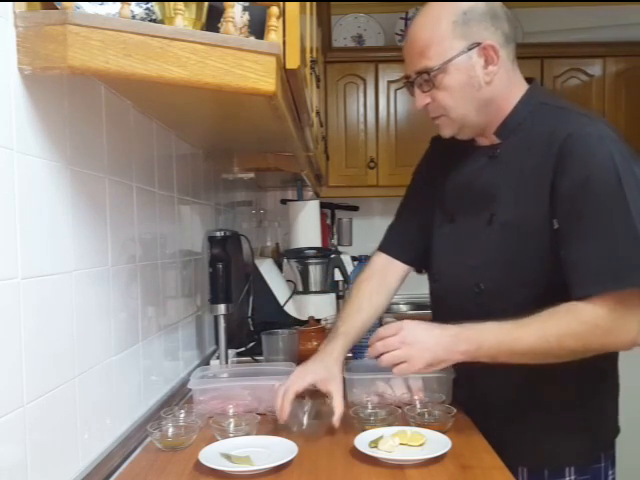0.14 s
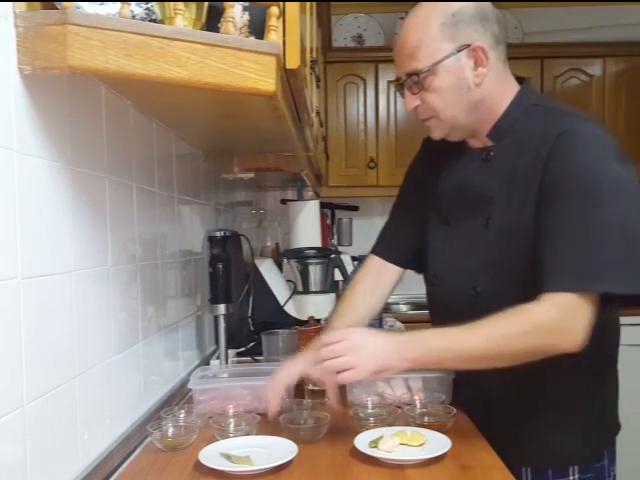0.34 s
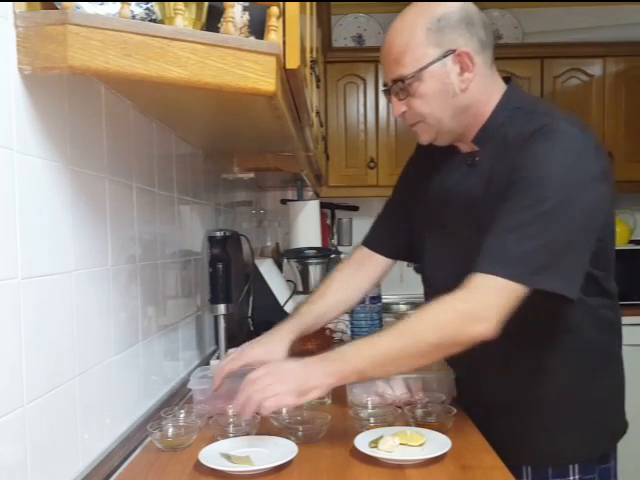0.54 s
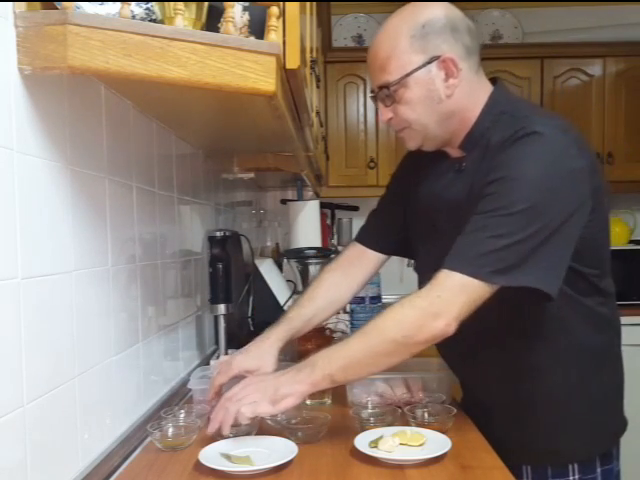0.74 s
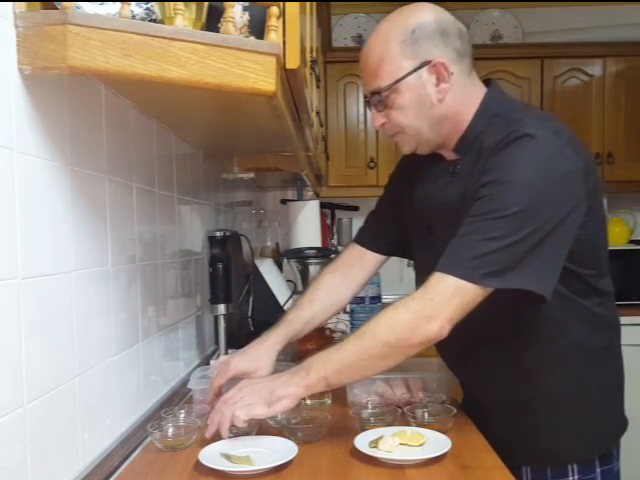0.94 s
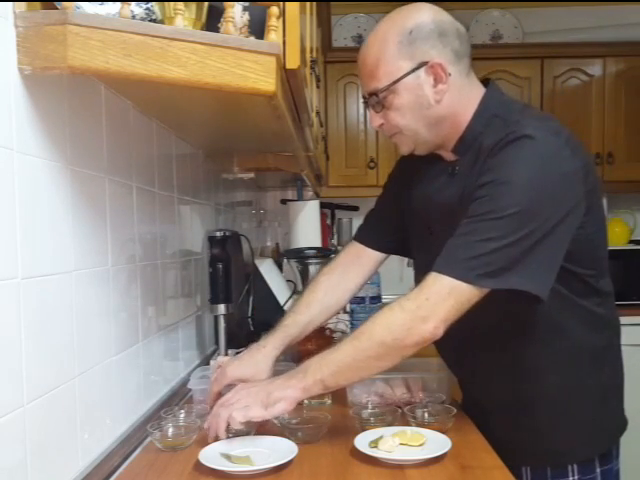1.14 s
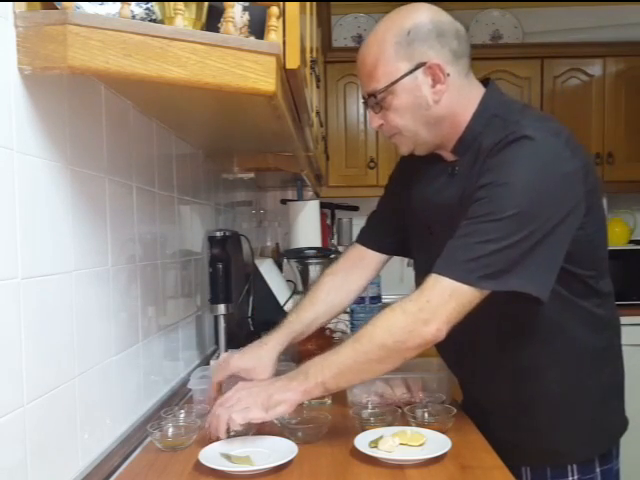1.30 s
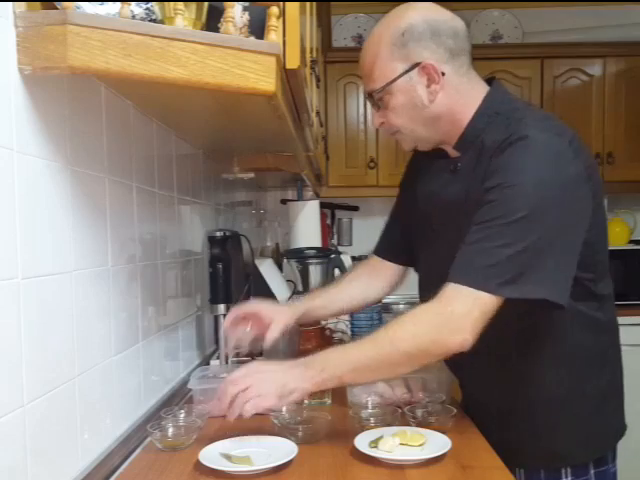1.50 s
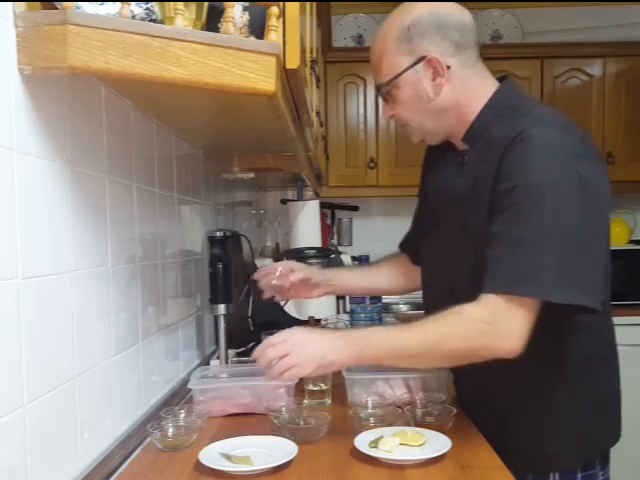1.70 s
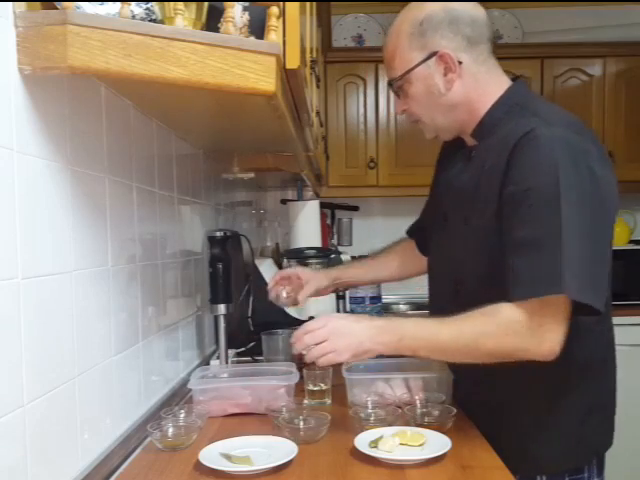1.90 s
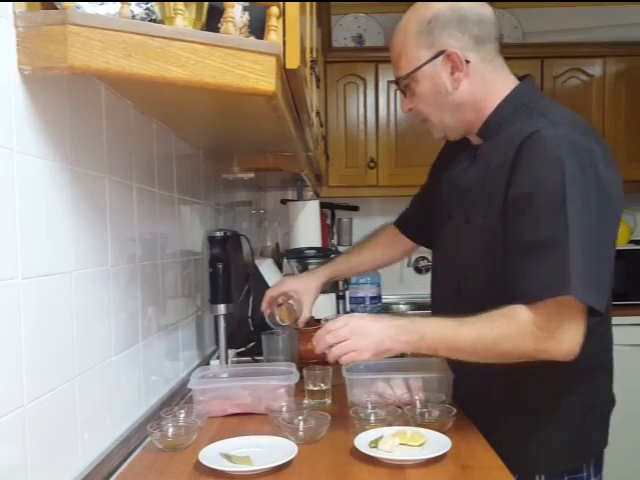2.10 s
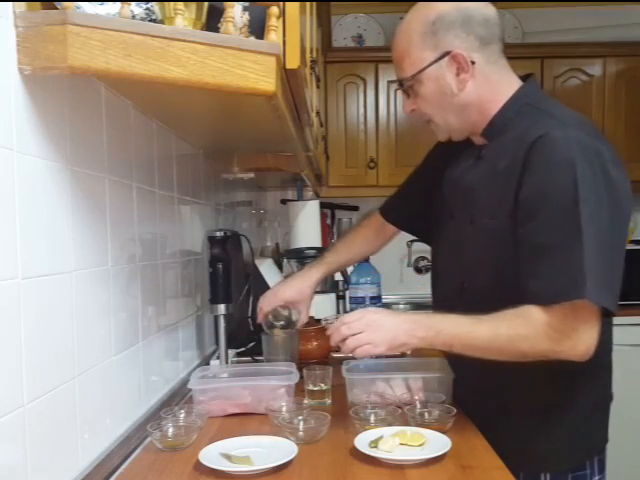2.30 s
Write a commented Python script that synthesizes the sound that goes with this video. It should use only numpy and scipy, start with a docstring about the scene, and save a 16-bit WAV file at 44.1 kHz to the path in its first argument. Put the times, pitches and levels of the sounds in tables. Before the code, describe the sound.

Glass bowls are set down and shuffled on a counter, clinking over a faint hum.

```python
"""A quiet appliance hum and room noise, then knocks: small glass bowls set down on a wooden counter.
Each contact is a short pulse that rings the counter and a tub; the tiled kitchen draws it out.
Nested bowls clink in their glass modes and rattle as they are dragged.
At the end a hollow vessel is tapped twice and its air column rings."""
import sys
import numpy as np
from scipy import signal
from scipy.fft import rfft, irfft
from scipy.io import wavfile

SR = 44100
rng = np.random.default_rng(int(sys.argv[2]) if len(sys.argv) > 2 else 0)


def wrap_up_sound(samples):
    """Save the sound to the file named by the first command line argument, as 16-bit audio."""
    columns = np.atleast_2d(samples).T
    # keep every value between -1 and 1, then stretch to whole-number steps
    tamed = np.clip(columns, -1, 1)
    steps = np.round(tamed * 32767).astype(np.int16)
    wavfile.write(sys.argv[1], SR, steps)


N = 103635

# room noise spectrum: f/Hz, level/dB
NOISE_SPECTRUM = [(30, -24.5), (60, -22.5), (100, -18.5), (180, -15), (260, -8), (420, -13), (700, -14),
                  (1200, -22), (2500, -28.5), (5000, -35), (8000, -42.5), (10000, -44), (14500, -48.5),
                  (16500, -62.5)]
# room noise drift: t/s, level/dB
NOISE_DRIFT = [(0, 1), (.7, 3.5), (1.6, -1), (1.85, 1.5), (2.0, -2), (2.35, -0.5)]
# room noise: f/Hz, left-right correlation
NOISE_CORRELATION = [(60, 0.49), (240, 0.45), (950, 0.18), (3770, 0.01), (15000, 0.0741)]
# appliance tones: f/Hz, rms level/dB
HUM_TONES = [(30, -83), (60.2, -69.5), (119.6, -79.5), (179.8, -72.5), (301, -63), (360.3, -77.5),
             (428, -70.5)]
# contacts: t/s, level/dB, 6 x colour/dB at COLOUR_HZ, counter ring/dB, own ring f/Hz, own ring/dB
CONTACTS = [(.2345, -12, 2.5, 1, 2.8, 3.5, 3, 0, -2.5, 1515, -10.5),
            (0.6218, -33.5, 23, 2, 0, -16.5, -1, -7, -3, 1327, -1),
            (.829, -41.5, 12, 23, 0.66, -7, -10, -12, -3, 874, -14),
            (0.8439, -28.5, 19.5, -9, 0, 12, 19, 9, -3, 2490, -18),
            (.859, -27.5, -17, -9, 0, -30, 4, -8, -7.5, 1358, 14.5),
            (0.8796, -40.5, -2.5, -32, 0.15, 11.5, -15, -8, 13, 3000, 11),
            (0.9303, -30, 5, 9, 0, -7, -11, 5.5, -5, 2056, 15),
            (0.988, -20.5, -11, 7.5, -4.5, -3, -8, -4, 0, 1775, -1.5),
            (1.0379, -16.5, 3, -2.5, 0.095, 2, 2, -13, -2.5, 1500, -3.5),
            (1.067, -27, -23.5, 14, 0.038, 6.5, -9, 1, -5.5, 1590, -1.5),
            (1.093, -32, 14, -6.5, 0.65, -4, -26, 1, 3.5, 1260, 11),
            (1.135, -37.5, 9.5, 15, 0.22, -19, -8, 2, -2.5, 1400, 3),
            (1.2195, -32, -1, 20.5, 1.6, 16, 26, 15.5, -9, 2234, 3.5),
            (1.81, -66.5, 4.5, 6.5, 0.35, 7, 5.5, -5, 0, 2070, 0),
            (2.2353, -51, 17, 8.5, 1, 5.5, 31, 15.5, 2, 3980, -3),
            (2.298, -47.5, 26, 12.5, 0.075, -10, 23.5, 5, -9, 1186, -7.5)]
# colour points: f/Hz
COLOUR_HZ = [170, 550, 1300, 2600, 5000, 14000]
# knock spectrum as heard through the microphone, with its 9.5 kHz dip and 14 kHz peak: f/Hz, level/dB
KNOCK_AT_MIC = [(30, -50.5), (80, -36.5), (170, -17), (300, -12), (600, -17.5), (1100, 2), (1800, 0),
                (2500, -6.5), (3300, -19.5), (4200, -20.5), (5500, -33.5), (7000, -34), (9500, -52),
                (11500, -38), (14200, -23.5), (15200, -34), (15800, -58.5)]
# modes of counter and tub: f/Hz, level/dB, t60/s
COUNTER_MODES = [(166.1, -19, 0.067), (466.7, -24.5, 0.3), (620.4, -18.5, 0.17), (760, -11, 0.19),
                 (1000, -10.5, 0.15), (1087, -10.5, 0.13), (1218, -16, 0.24), (1295, -10.5, 0.092),
                 (1521, -12.5, 0.17), (1636, -9.5, 0.041)]
# near walls: delay t/s, level/dB
WALL_ECHOES = [(.0022, -9.5), (0.0131, -2.5), (.033, -10)]
# reverb decay: f/Hz, t60/s
TAIL_T60 = [(80, 0.57), (200, 0.49), (500, 0.54), (1200, 0.47), (2500, 0.43), (5000, 0.35), (9000, 0.38),
            (14000, 0.44)]
# reverb: f/Hz, left-right correlation
TAIL_CORRELATION = [(100, 1), (300, 0.76), (600, 0.82), (1200, 0.43), (4000, -0.2), (14000, -0.072)]
# balance of reverb and room noise: f/Hz, left minus right/dB
BALANCE = [(60, 1), (180, 4.0), (550, 2), (1650, 1.5), (4970, 5), (15000, -2)]
# glass on glass: t/s, 6 x level/dB at CLINK_POINTS_HZ
CLINK_HITS = [(.6225, -76, -72, -78, -89.5, -88, -95), (0.8415, -40.5, -32, -49.5, -54, -40, -59.5),
              (0.8804, -28.5, -50.5, -24, -42, -39.5, -60.5), (0.9043, -29.5, -32.5, -71, -60, -49.5, -60),
              (0.9306, -26, -57, -65.5, -74, -57.5, -47.5), (.989, -24.5, -53.5, -63, -70, -56, -42),
              (1.0397, -34.5, -69, -57.5, -83, -59, -43.5), (1.091, -25.5, -71.5, -63.5, -81, -65.5, -44.5),
              (1.221, -35, -48, -37, -53, -65, -74)]
# clink level points: f/Hz
CLINK_POINTS_HZ = [1900, 4000, 7100, 8900, 12000, 14100]
# bowl modes: f/Hz
BOWL_HZ = [1881, 1926, 2466, 3997, 4037, 4110, 6998, 7176, 8818, 9001, 11900, 11970, 14120]
# per bowl mode: level/dB, t60/s
BOWL_MODES = [(-1, .3), (0.5, 0.09), (-21, 0.068), (2.5, 0.1), (1.5, 0.27), (-3, 0.3), (-13, .3),
              (-7, 0.13), (5, 0.13), (1.5, 0.16), (-14, 0.15), (-0.5, 0.18), (6, .2)]
# drag envelope: t/s, level/dB
DRAG_LEVEL = [(.83, -56.5), (0.861, -37), (0.999, -41), (1.098, -43), (1.16, -58.5), (1.2, -67)]
# vessel taps: t/s, level/dB, f/Hz, swell/s, t60 factor
VESSEL_TAPS = [(2.236, -39, 600, 0.00057, 1), (2.295, -19, 558, 0.011, 0.47)]
# air column modes: frequency ratio, level/dB, t60/s
VESSEL_MODES = [(1.0, -2.5, 0.17), (1.2, 6, 0.027), (2.97, -12, 0.11), (5.0, -10, 0.052)]

BAND_EDGES_HZ = 28 * 2 ** np.arange(0, 9.4, 1 / 3)
BAND_CENTRES_HZ = np.sqrt(BAND_EDGES_HZ[:-1] * BAND_EDGES_HZ[1:])
TIME_S = np.arange(N) / SR
SIDES = np.array([[1], [-1]])   # left, right


def from_db(db):
    return 10 ** (np.asarray(db) / 20)


def at_hz(points, hz):
    points_hz, values = np.transpose(points)
    return np.interp(np.log(hz), np.log(points_hz), values)


def band(x, k):
    return signal.sosfilt(signal.butter(4, BAND_EDGES_HZ[k:k + 2], "band", fs=SR, output="sos"), x)


def stereo(noise, correlation, hz):
    """Two noises as mid and side, panned by BALANCE."""
    correlation = np.clip(correlation, -.99, .99)
    mid = np.sqrt((1 + correlation) / 2) * noise[0]
    side = np.sqrt((1 - correlation) / 2) * noise[1]
    return from_db(at_hz(BALANCE, hz) / 2 * SIDES) * (mid + side * SIDES)


def ring(times_s, levels_db, hz, t60_s):
    """Clicks, softened over one cycle, drive a damped mode."""
    clicks = np.zeros(N)
    clicks[(np.asarray(times_s) * SR).astype(int)] = from_db(levels_db)
    window = np.hanning(int(SR / hz) + 3)
    force = signal.lfilter(2 * window / window.sum(), [1], clicks)
    radius, angle = from_db(-60 / (t60_s * SR)), 2 * np.pi * hz / SR
    return signal.lfilter([0, np.sin(angle)], [1, -2 * radius * np.cos(angle), radius ** 2], force + 1e-18)


def appliance_hum(waver_db=2.5):
    """Low tones, each wavering in level, slightly left."""
    out = 0
    for hz, db in HUM_TONES:
        waver = np.interp(TIME_S, np.linspace(0, N / SR, 30), rng.standard_normal(30))
        tone = np.sqrt(2) * np.sin(2 * np.pi * (hz * TIME_S + rng.random()))
        out += from_db(db + waver_db * waver) * tone
    return out * from_db(1.5 * SIDES)


def room_noise(base_db=-59):
    """Third-octave noise bands; the overall level drifts."""
    noise, out = rng.standard_normal((2, 2, N)), 0
    for k, hz in enumerate(BAND_CENTRES_HZ):
        pair = stereo(band(noise[k % 2], k), at_hz(NOISE_CORRELATION, hz), hz)
        out += from_db(at_hz(NOISE_SPECTRUM, hz)) * pair
    drift_db = np.interp(TIME_S, *np.transpose(NOISE_DRIFT))
    return from_db(base_db + drift_db) * out / np.sqrt(np.mean(out ** 2))


def knock_pulse(colour_db, gain_db=21):
    """Minimum-phase pulse: knock spectrum as heard through the microphone, plus colour."""
    hz = np.maximum(np.fft.rfftfreq(4096, 1 / SR), 1)
    db = gain_db + at_hz(KNOCK_AT_MIC, hz) + np.interp(np.log(hz), np.log(COLOUR_HZ), colour_db)
    cepstrum = irfft(db * np.log(10) / 20)
    causal_fold = np.r_[1, np.full(2047, 2), 1, np.zeros(2047)]
    return irfft(np.exp(rfft(cepstrum * causal_fold)))


def knocks():
    """One pulse per contact with counter or tub."""
    out = np.zeros(N + SR)
    for start_s, db, *colour_db in np.array(CONTACTS)[:, :8]:
        pulse = from_db(db) * knock_pulse(colour_db)
        out[int(start_s * SR):][:len(pulse)] += pulse
    return out[:N]


def counter_ring(scatter_db=0.83):
    """Each knock excites the modes of counter and tub."""
    rows, out = np.array(CONTACTS), 0
    times_s, knock_db, colours_db, ring_db = rows[:, 0], rows[:, 1], rows[:, 2:8], rows[:, 8]
    random_db = rng.normal(0, scatter_db, (len(rows), len(COUNTER_MODES)))
    for k, (hz, mode_db, t60_s) in enumerate(COUNTER_MODES):
        colour_db = [np.interp(np.log(hz), np.log(COLOUR_HZ), colour) for colour in colours_db]
        out += ring(times_s, mode_db + knock_db + colour_db + ring_db + random_db[:, k], hz, t60_s)
    return out


def contact_rings(t60_s=0.051):
    """Each knock also rings at its own pitch."""
    return sum(ring([start_s], db + ring_db, hz, t60_s) for start_s, db, *_, hz, ring_db in CONTACTS)


def kitchen(pulses, rings, pulse_tail_db=-17, ring_tail_db=-31.5):
    """Direct sound, wall echoes and a noise tail decaying per band."""
    onset_s, left_delay_s, near_balance_db = 0.0018, 0.00016, 4.5
    t, noise, tail = np.arange(SR // 2) / SR, rng.standard_normal((2, SR)), 0
    for k, hz in enumerate(BAND_CENTRES_HZ):
        envelope = from_db(-60 * t / at_hz(TAIL_T60, hz)) * (1 - np.exp(-t / onset_s))
        tail += envelope * stereo(band(noise, k)[:, -len(t):], at_hz(TAIL_CORRELATION, hz), hz)
    near = np.zeros_like(tail)
    near[0, int(left_delay_s * SR)] = near[1, 0] = 1
    for delay_s, db in WALL_ECHOES:
        delay_samples = (delay_s * SR * rng.uniform(.97, 1.03, 2)).astype(int)
        near[[0, 1], delay_samples] = from_db(db)
    near *= from_db(near_balance_db / 2 * SIDES)
    return sum(signal.fftconvolve(x[None], near + from_db(tail_db) * tail)[:, :N]
               for x, tail_db in [(pulses, pulse_tail_db), (rings, ring_tail_db)])


def bowl_clinks(scatter_db=1):
    """Glass on glass: each hit excites all bowl modes with its own spectrum."""
    hits, out = np.array(CLINK_HITS), 0
    random_db = rng.normal(0, scatter_db, (len(hits), len(BOWL_MODES)))
    for k, (hz, (mode_db, t60_s)) in enumerate(zip(BOWL_HZ, BOWL_MODES)):
        hit_db = np.array([np.interp(np.log(hz), np.log(CLINK_POINTS_HZ), hit[1:]) for hit in hits])
        out += ring(hits[:, 0], mode_db + hit_db + random_db[:, k], hz, t60_s)
    return out


def bowl_drag(touches_per_s=200):
    """Dragged bowls rattle in small, uneven touches."""
    envelope = from_db(np.interp(TIME_S, *np.transpose(DRAG_LEVEL), left=-200, right=-200))
    sizes = from_db(6.58 * np.minimum(rng.exponential(1, N), 4)) * rng.choice([-1, 1], N)
    touches = envelope * sizes * (rng.random(N) < touches_per_s / SR)
    return signal.fftconvolve(touches, knock_pulse(colour_db=np.zeros(6)))[:N]


def vessel_taps():
    """Air column of an open vessel: modes, mostly near odd multiples, swell and die."""
    out = 0
    for start_s, db, hz, swell_s, t60_factor in VESSEL_TAPS:
        age_s = np.maximum(TIME_S - start_s, 0)
        swell = (1 - np.exp(-age_s / swell_s)) ** 2
        for ratio, mode_db, t60_s in VESSEL_MODES:
            decay = from_db(db + mode_db - 60 * age_s / (t60_s * t60_factor))
            out += swell * decay * np.sin(2 * np.pi * ratio * hz * age_s)
    return out


def scene(bass_cut_hz=123):
    """Impacts in the kitchen over noise and hum; the struck sounds carry little deep bass."""
    pulses = knocks() + bowl_drag()
    rings = bowl_clinks() + vessel_taps() + counter_ring() + contact_rings()
    highpass = signal.butter(3, bass_cut_hz, "high", fs=SR, output="sos")
    return signal.sosfilt(highpass, kitchen(pulses, rings)) + room_noise() + appliance_hum()


def record(dry, stopband_hz=16200):
    """Steep low-pass."""
    return signal.sosfilt(signal.cheby2(18, 70, stopband_hz, fs=SR, output="sos"), dry)


dry = scene()
out = record(dry)
wrap_up_sound(out)
```